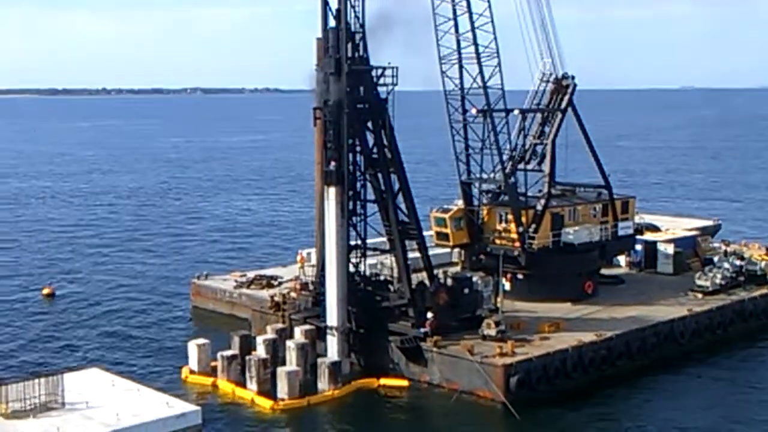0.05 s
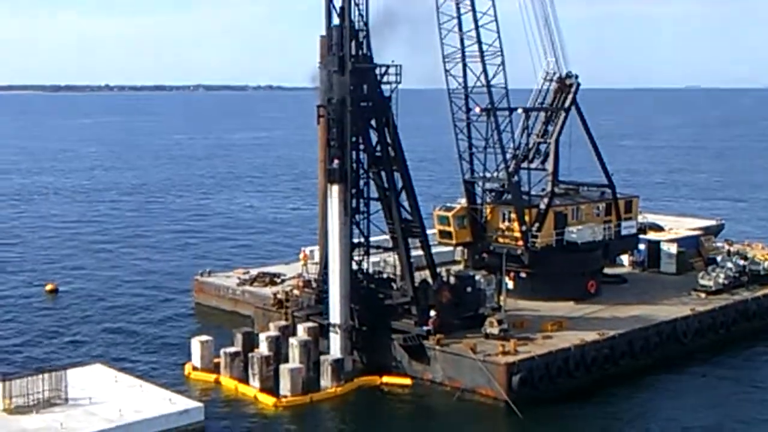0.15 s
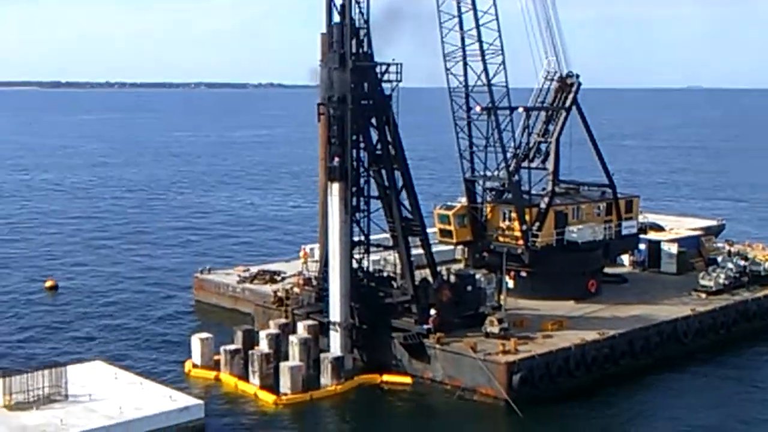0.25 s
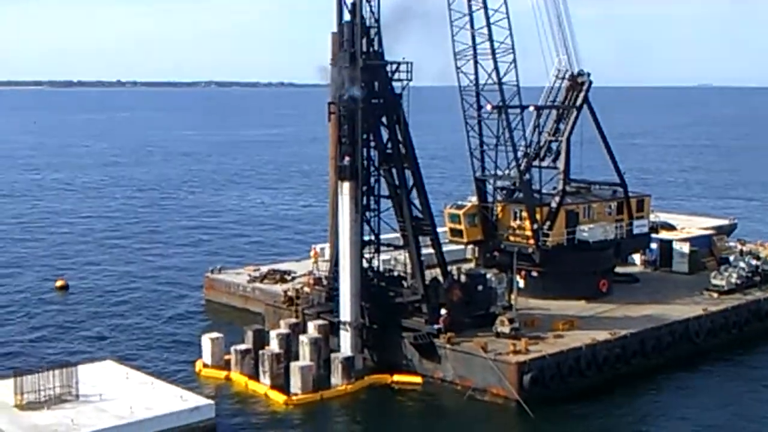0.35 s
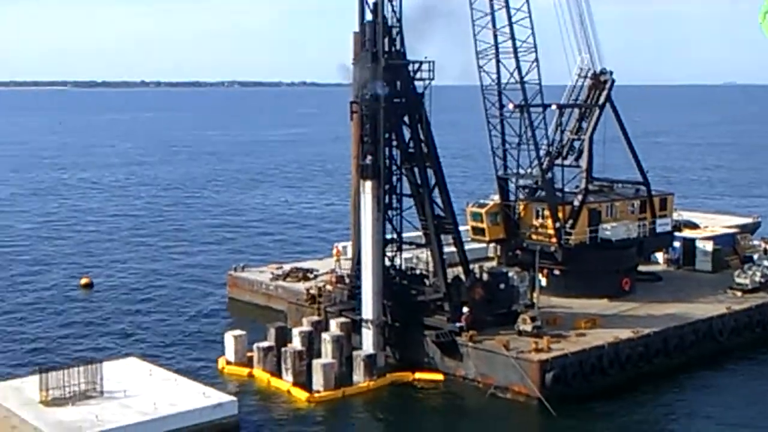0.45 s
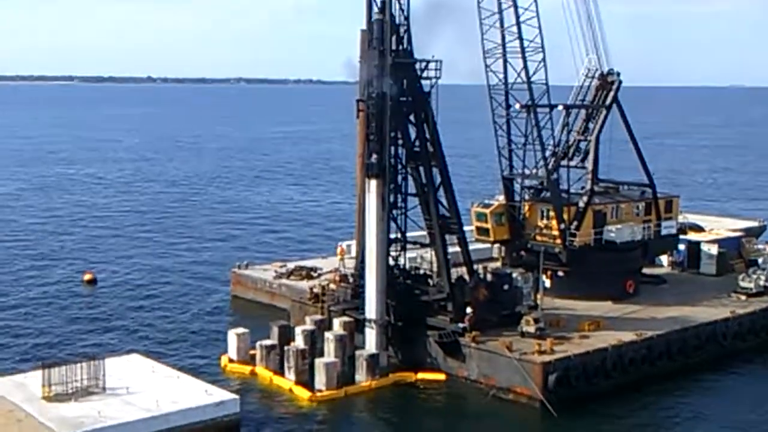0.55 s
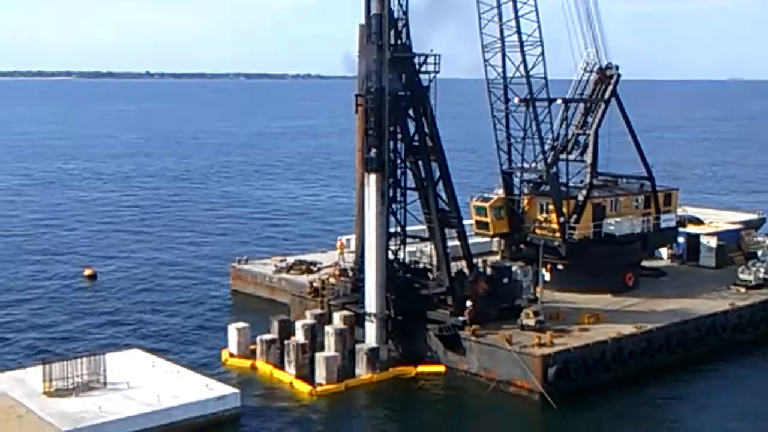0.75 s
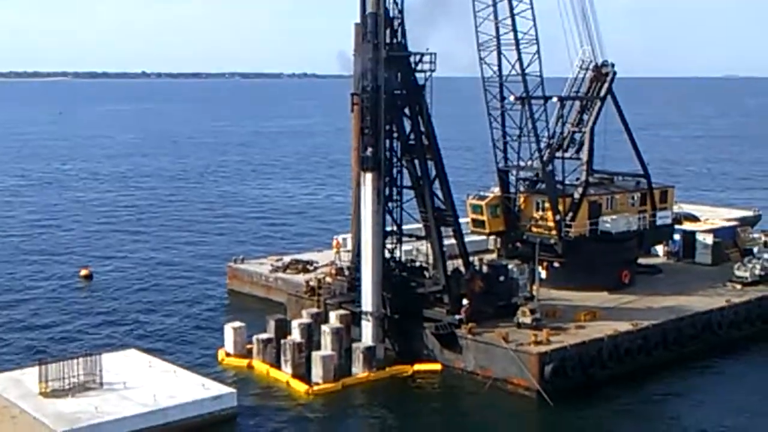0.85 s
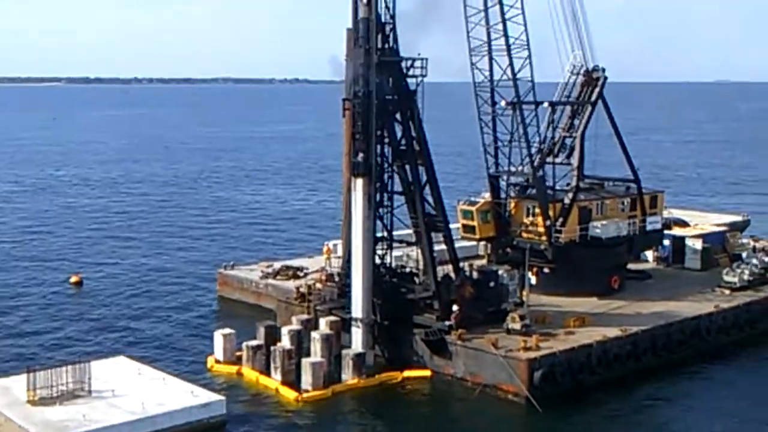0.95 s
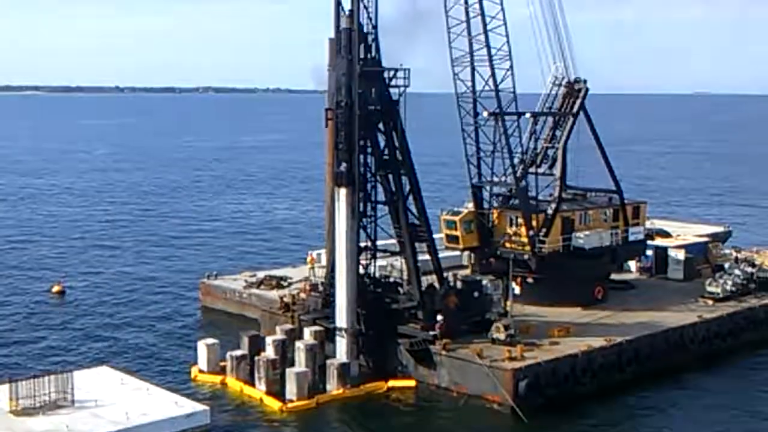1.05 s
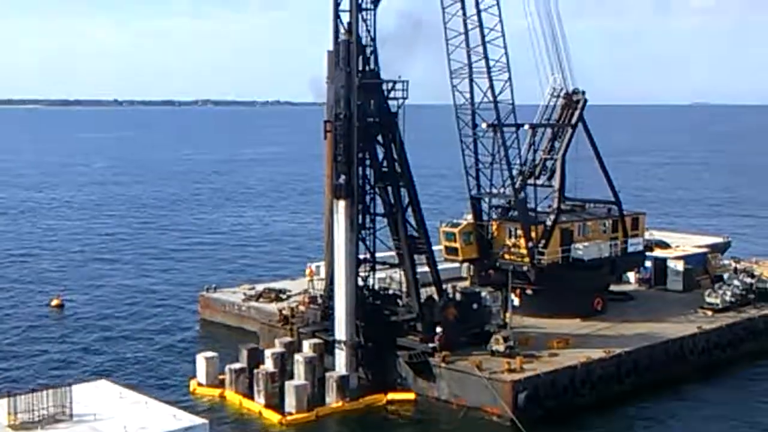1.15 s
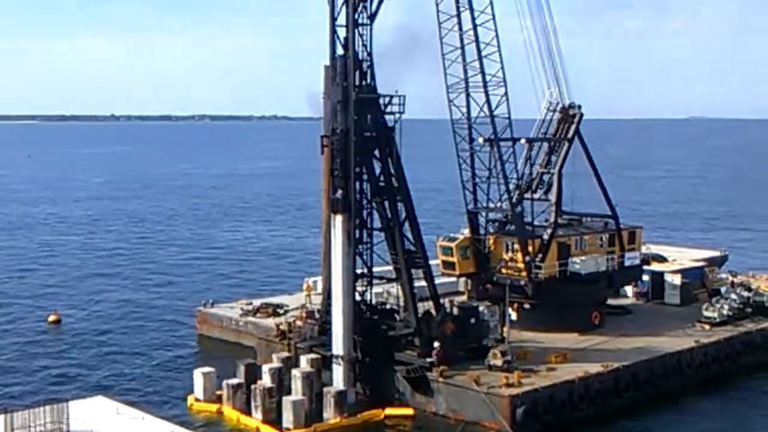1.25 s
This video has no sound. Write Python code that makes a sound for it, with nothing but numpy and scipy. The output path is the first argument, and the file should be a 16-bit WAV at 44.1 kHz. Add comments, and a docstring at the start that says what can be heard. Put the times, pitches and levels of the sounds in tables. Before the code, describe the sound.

A pile hammer blow across open water. Engines rumble quietly on a barge; air hiss swells around 0.17 seconds with small hollow lever knocks. At 0.37 a hard, bright steel crash hits, ringing and wavering; a harsh exhaust blast roars from 0.52, a weaker puff follows near 0.77. Faint echo and clink arrive just after 1.0 as ringing fades. Wind thumps the microphone; loud peaks sound squashed.

```python
"""On a barge, heard across open water: one blow of a diesel pile hammer.
The falling ram hisses air from its ports (shaped noise) and knocks a lever (decaying sines), then strikes:
steel crashes (noise bands) and rings (wavering tones), exhaust blasts out and puffs, a fitting clinks.
Engines rumble on deck, wind bumps the microphone, and the recorder's limiter holds the blow down."""
import sys
import numpy as np
from scipy import signal
from scipy.fft import rfft, irfft
from scipy.io import wavfile

SR = 44100
rng = np.random.default_rng(int(sys.argv[2]) if len(sys.argv) > 2 else 0)


def inscribe(sig):
    """Save sig as 16-bit PCM at rate SR to the path in sys.argv[1].

    A 1-D sig is mono; a 2-D sig holds one channel per row.
    Samples are clipped to [-1, 1] before scaling.
    """
    pcm = np.round(np.clip(np.atleast_2d(sig).T, -1, 1) * 32767)
    wavfile.write(sys.argv[1], SR, pcm.astype(np.int16))


N = 57330
TIME = np.arange(N) / SR
STRIKE_S, STRIKE_RISE_S = 0.3682, 0.0012

# stereo tilt of the scene: pitch_hz, left_minus_right_db
BALANCE = [(100, 0), (600, 0), (1050, -2.5), (1500, 4.3), (2100, 4), (3300, 7), (5500, 0.7), (7000, 0),
           (8700, -8), (10500, 4.5), (13000, 1.5)]


def from_db(db):
    """Decibels to gain."""
    return 10 ** (np.asarray(db) / 20)


def rms_one(x):
    """Scale to unit power."""
    return x / np.sqrt(np.mean(x ** 2) + 1e-20)


def at_hz(points, hz, axis=1):
    """Read one column of a table on a log-frequency axis."""
    points = np.array(points)
    return np.interp(np.log(np.maximum(hz, 1)), np.log(points[:, 0]), points[:, axis])


def pan(left_minus_right_db):
    """Left and right gains of constant power."""
    gains = from_db(np.array([[0.5], [-0.5]]) * left_minus_right_db)
    return gains / np.sqrt(np.mean(gains ** 2, axis=0))


def drift(rate_hz):
    """Random wandering of about unit spread, its spectrum halved in amplitude at the given rate."""
    length = 4 * N  # drawn longer than the scene, then cut
    hz = np.fft.rfftfreq(length, 1 / SR)
    spectrum = rfft(rng.standard_normal(length)) / (1 + (hz / rate_hz) ** 2)
    return rms_one(irfft(spectrum))[:N]


def envelope(start_s, rise_s, hold_s, t60_s):
    """Linear attack, hold, then exponential release by 60 dB in t60_s."""
    age = TIME - start_s
    attack = np.clip(age / rise_s, 0, 1)
    return attack * np.exp(-np.log(1000) * np.maximum(age - rise_s - hold_s, 0) / t60_s)


def pink_pair():
    """Spectrum of stereo pink noise, mostly alike in the bass and diffuse in the treble."""
    # stereo likeness: pitch_hz, left_right_correlation (0-1)
    likeness = [(50, 0.67), (150, 1), (700, 0.64), (1500, 0.25), (2700, 0.51), (4200, 0.17), (7000, 0.16),
                (12000, .05)]
    hz = np.fft.rfftfreq(N, 1 / SR)
    mid, side = rfft(rng.standard_normal((2, N)))
    alike = np.clip(at_hz(likeness, hz), -1, 1)
    pair = np.sqrt((1 + alike) / 2) * mid + np.sqrt((1 - alike) / 2) * side * [[1], [-1]]
    # a third octave spans about 0.23 of its centre frequency: unit power in each
    third_octave_gain = np.sqrt(SR / 2 / (0.23 * np.maximum(hz, 20)))
    return hz, pair * pan(at_hz(BALANCE, hz)) * third_octave_gain


def noise(spectrum):
    """Stereo noise with the given third-octave levels."""
    hz, pair = pink_pair()
    return irfft(pair * from_db(at_hz(spectrum, hz)), N)


def mode_peaks(hz):
    """Gain of closely packed resonances, high and low by chance."""
    contrast_db, width_hz, step_hz = 2, 57, 8
    grid = np.arange(0, SR / 2, step_hz)
    smoothing = np.exp(-step_hz / width_hz)
    uneven = rms_one(signal.lfilter([1], [1, -smoothing], rng.standard_normal(len(grid))))
    return rms_one(from_db(contrast_db * np.interp(hz, grid, uneven)))


def engines():
    """Steady, slightly fluttering rumble of the deck machinery, as noise with a wandering level."""
    # engine rumble: pitch_hz, level_db (per third octave)
    rumble = [(25, -73), (40, -50), (60, -41.5), (110, -48.5), (190, -38.5), (300, -44), (430, -48.5),
              (620, -38), (850, -35.5), (1200, -44), (2000, -45.5), (3200, -47.5), (5000, -59), (9000, -53),
              (11000, -65), (13000, -82)]
    flutter_db = 2
    return noise(rumble) * from_db(flutter_db * drift(rate_hz=19.5))


def port_hiss():
    """Air pushed out by the falling ram: hiss swells as it speeds up and fades as it covers the ports."""
    # air hiss: pitch_hz, relative_level_db (per third octave)
    hiss = [(2000, -44), (3300, -15.5), (4800, -22), (6500, -8), (9000, 0), (10500, -3.5), (12500, -16),
            (14000, -21)]
    peak_s, peak_db, round_s = 0.17, -26, 0.049
    rise_db_per_s, fall_db_per_s = 139, 71
    age = TIME - peak_s
    slope = np.where(age < 0, rise_db_per_s, fall_db_per_s)
    # straight slopes in decibels with a rounded top
    level_db = peak_db - slope * (np.hypot(age, round_s) - round_s)
    return rms_one(noise(hiss)) * from_db(level_db) * pan(-0.5)


def trip_gear():
    """Short hollow knocks of the lever, each exciting three decaying modes."""
    # knocks: start_s, relative_level_db, left_minus_right_db
    knocks = [(.185, -14.5, 4), (.2315, -4, 9), (.2435, -36, -4), (.262, -15, 6), (.362, -8.5, 0),
              (.872, -15.5, -6)]
    # lever modes: pitch_hz, relative_level_db, t60_s
    lever = [(737, -4, 0.021), (801.4, -0.5, 0.062), (935, -8, 0.11)]
    out = np.zeros((2, N))
    for start_s, knock_db, pan_db in knocks:
        ring = np.zeros(N)
        for hz, mode_db, t60_s in lever:
            tone = np.sin(2 * np.pi * hz * (TIME - start_s))
            ring += from_db(mode_db) * tone * envelope(start_s, 0.0037, 0, t60_s)
        out += 0.5 * from_db(knock_db) * ring * pan(pan_db)
    return out


def wind():
    """Low lumps of turbulence bump the microphone, mostly on its right port."""
    # bumps: centre_s, level_db (right port, before the swell), spread_s (of the bell curve), upper_edge_hz
    bumps = [(0.197, -26.5, 0.044, 89), (0.283, -14.5, 0.01, 297), (0.355, -17.5, 0.032, 202),
             (0.417, -18.5, 0.029, 314), (0.489, -10.5, 0.014, 162), (0.538, -14, 0.014, 110),
             (0.604, -18, 0.036, 263), (0.753, -19, 0.042, 307), (0.81, -17, 0.024, 200),
             (0.912, -30.5, 0.026, 120), (1.234, -20, 0.022, 110)]
    low_hz, left_db, shared_gain = 52, -15.5, 0.14
    out = np.zeros((2, N))
    for centre_s, level_db, spread_s, top_hz in bumps:
        edges_hz = [low_hz, max(top_hz, low_hz + 10)]
        band = signal.butter(2, edges_hz, "band", fs=SR, output="sos")
        lump = rms_one(signal.sosfilt(band, rng.standard_normal((2, N))))
        out += from_db(level_db) * lump * np.exp(-0.5 * ((TIME - centre_s) / spread_s) ** 2)
    left = from_db(left_db) * out[0] + shared_gain * out[1]
    return np.array([left, out[1]])


def crash():
    """Countless steel modes as noise bands dying at their own pace, with a crack, a reflection and a tail."""
    # hammer and pile: pitch_hz, level_db (per third octave), t60_s
    body = [(60, -36, 1.7), (150, -31, 1.6), (290, -17, 1.35), (400, -27, 1.73), (596, -11, 0.95),
            (896, -17, 0.91), (1370, -13.5, 0.5), (2060, -11.5, 0.71), (3300, -16, 1.1), (5500, -19, 0.7),
            (8870, -17, 1.42), (10900, -20.5, 0.37), (13500, -33, 0.25)]
    # bright first contact: pitch_hz, relative_level_db (per third octave)
    crack = [(700, -19), (2000, 5.5), (4500, -9), (9000, 1), (14000, -3.5)]
    hold_s, body_build_s, body_below_hz = 0.12, 0.045, 950
    crack_db, slap_db, tail_db = -7, -3.5, -17.5
    tail_t60_s, air_loss_hz = 2.8, 15800

    out = from_db(crack_db) * rms_one(noise(crack)) * envelope(STRIKE_S, STRIKE_RISE_S, 0, 0.8)
    # a near reflection swells behind the blast
    slap = from_db(slap_db) * envelope(0.5824, 0.046, 0, 0.31)
    hz, pair = pink_pair()
    pair = pair * from_db(at_hz(body, hz)) * mode_peaks(hz)
    centres = np.geomspace(50, 14000, 16)
    for centre, share in zip(centres, np.eye(len(centres))):
        # overlapping bands that add up to the whole
        band = irfft(pair * at_hz(np.c_[centres, share], hz), N)
        # the low ringing needs time to build
        rise_s = STRIKE_RISE_S + body_build_s / (1 + (centre / body_below_hz) ** 6)
        build = np.sqrt(np.clip((TIME - STRIKE_S) / rise_s, 0, 1))
        direct = envelope(STRIKE_S, STRIKE_RISE_S, hold_s, at_hz(body, centre, axis=2))
        # air halves the reflection's gain and the tail's decay time at air_loss_hz
        air = 1 / (1 + centre / air_loss_hz)
        # scatter from barge and shore, leaning left
        tail = from_db(tail_db) * envelope(STRIKE_S, hold_s, 0, tail_t60_s * air) * pan(5)
        out += band * build * np.sqrt(direct ** 2 + (air * slap) ** 2 + tail ** 2)
    return out


def ringing_steel():
    """The strong modes of hammer and pile waver as reflections mix in, and return once from the shore."""
    # steel modes: pitch_hz, level_db, t60_s, waver (0-1)
    steel = [(249.1, -18, 1.1, 0.3), (525.2, -17, 3.74, 0.19), (535.2, -14, 1.84, 0.33),
             (582, -16, 1.6, 0.9), (632, -8, 0.72, 0.24), (693, -19, .6, 0.6), (738, -26, 0.95, 0.7),
             (1170, -28, 0.42, 0.43), (1313, -13.5, 0.5, 0.1), (1585, -13, 0.75, .3),
             (1616, -34, 3.9, 0.67), (2019, -17, 0.91, 0.66), (2060, -30, 2.7, 0.45),
             (2140, -36, 0.64, 0.3), (2840, -23.5, 1.35, 0.64), (3684, -31, 1.0, 0.7),
             (10190, -20, 0.27, 0.94)]
    waver_rate_hz, build_s, echo_db = 7, 0.061, -15.5
    apart_gain = 0.62  # part of the wavering that differs between left and right
    out = np.zeros((2, N))
    echo = from_db(echo_db) * envelope(1.02, 0.011, 0, 0.3)
    for hz, level_db, t60_s, waver in steel:
        # complex drift moves both strength and phase
        shared, apart = [drift(waver_rate_hz) + 1j * drift(waver_rate_hz) for _ in range(2)]
        scatter = shared + apart_gain * apart * [[1], [-1]]
        carrier = np.exp(2j * np.pi * (hz * TIME + rng.random()))
        tone = np.real((1 + waver * scatter) * carrier)
        own = envelope(STRIKE_S, build_s, 0, t60_s)
        # modes that die sooner also echo more faintly
        swell = own + echo * np.sqrt(own)
        out += from_db(level_db) * tone * swell * pan(at_hz(BALANCE, hz))
    return out


def exhaust():
    """Gas roars through the steel ports as the ram rebounds, as resonant noise; a weaker puff follows."""
    # blast: pitch_hz, relative_level_db (per third octave)
    blast_spectrum = [(300, -39), (1000, -21), (2200, -8.5), (3700, -5.5), (5500, -8), (7000, -7.5),
                      (9000, -2), (11000, -5), (12000, -14), (14000, -17)]
    # puff: pitch_hz, relative_level_db (per third octave)
    puff_spectrum = [(1500, -9), (3200, -6.5), (4300, -2), (5800, 1), (7500, -6.5), (9500, 3), (11000, -9),
                     (12500, -26)]
    blast_db, puff_db = 2.5, -20
    hz, pair = pink_pair()
    roar = rms_one(irfft(pair * from_db(at_hz(blast_spectrum, hz)) * mode_peaks(hz), N))
    blast = from_db(blast_db) * roar * envelope(0.515, 0.041, 0.033, 0.31)
    puff = from_db(puff_db) * rms_one(noise(puff_spectrum)) * envelope(0.7684, 0.021, 0.018, 0.32)
    return blast + puff


def clink():
    """A loose steel fitting rattles briefly after the blow, as narrow noise for a tight cluster of modes."""
    centre_hz, width_hz, level_db = 2860, 200, -31.5
    hz = np.fft.rfftfreq(N, 1 / SR)
    resonance = 1 / (1 + (2 * (hz - centre_hz) / width_hz) ** 2)
    cluster = rms_one(irfft(rfft(rng.standard_normal(N)) * resonance, N))
    swell = envelope(1.06, 0.0067, 0, 0.13)
    return from_db(level_db) * cluster * swell * pan(at_hz(BALANCE, centre_hz))


def scene():
    """The hammer's cycle over engines and wind."""
    hammer = port_hiss() + trip_gear() + crash() + ringing_steel() + exhaust() + clink()
    return engines() + wind() + hammer


def record(dry):
    """A limiter ducks everything under the loudest moments, peaks are rounded off, bottom and top are cut."""
    low_cut_hz, high_cut_hz = 44, 14300
    limit_db, attack_s, release_db_per_s, ceiling = -5.5, 0.0055, 86, 0.85
    dry = signal.sosfilt(signal.butter(2, low_cut_hz, "high", fs=SR, output="sos"), dry)
    smoothing = np.exp(-1 / (attack_s * SR))
    power = signal.lfilter([1 - smoothing], [1, -smoothing], np.mean(dry ** 2, axis=0))
    over_db = np.maximum(10 * np.log10(power + 1e-12) - limit_db, 0)
    # the gain reduction follows each rise and lets go at a steady rate
    fall_db = release_db_per_s * TIME
    reduction_db = np.maximum.accumulate(over_db + fall_db) - fall_db
    held = dry * from_db(-reduction_db)
    rounded = held / (1 + (held / ceiling) ** 6) ** (1 / 6)
    return signal.sosfilt(signal.ellip(10, 0.2, 70, high_cut_hz, fs=SR, output="sos"), rounded)


dry = scene()
out = record(dry)
inscribe(out)
```